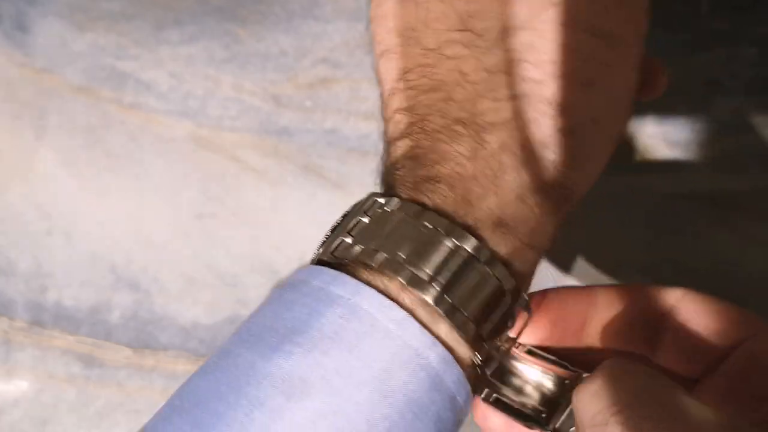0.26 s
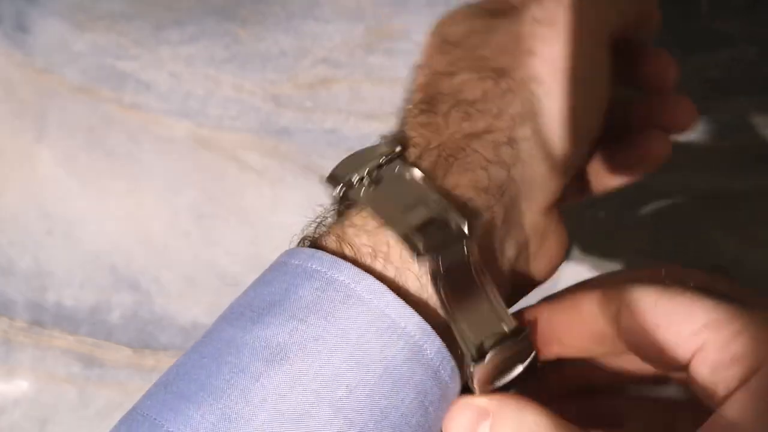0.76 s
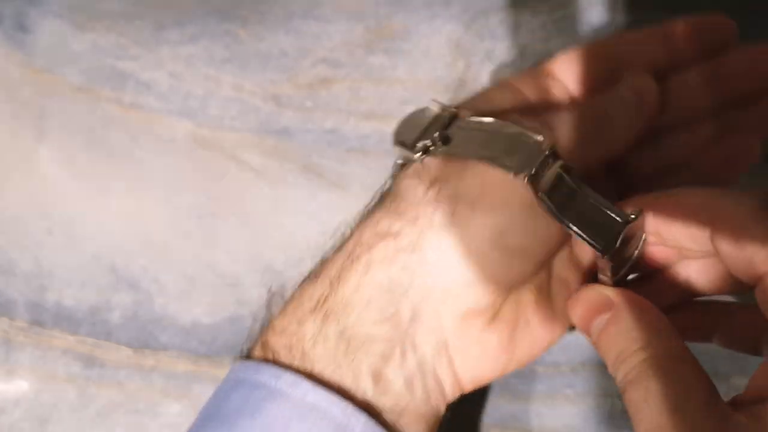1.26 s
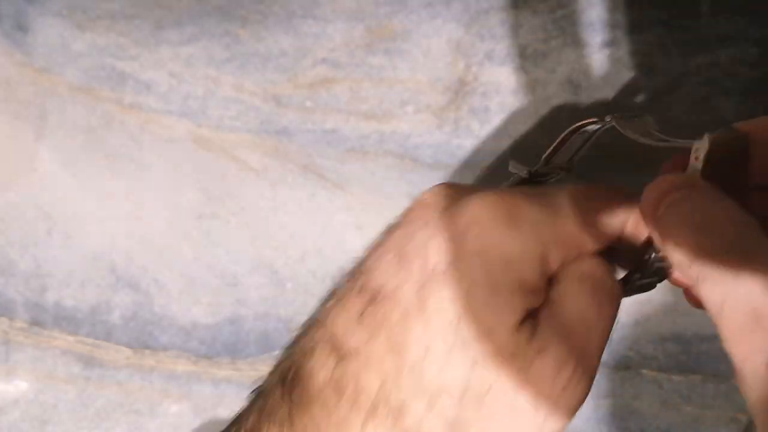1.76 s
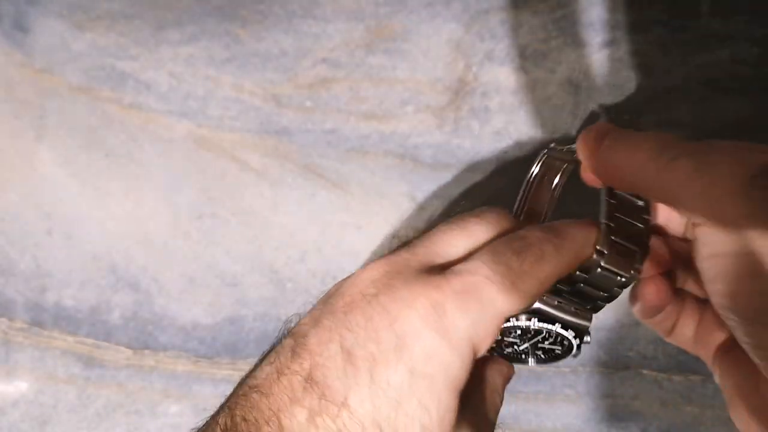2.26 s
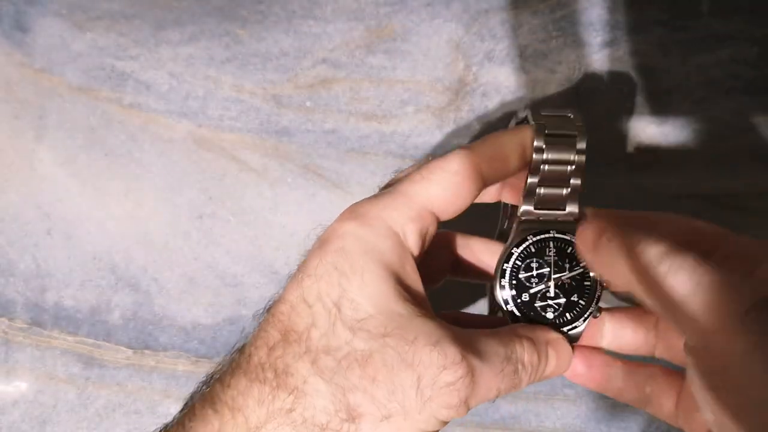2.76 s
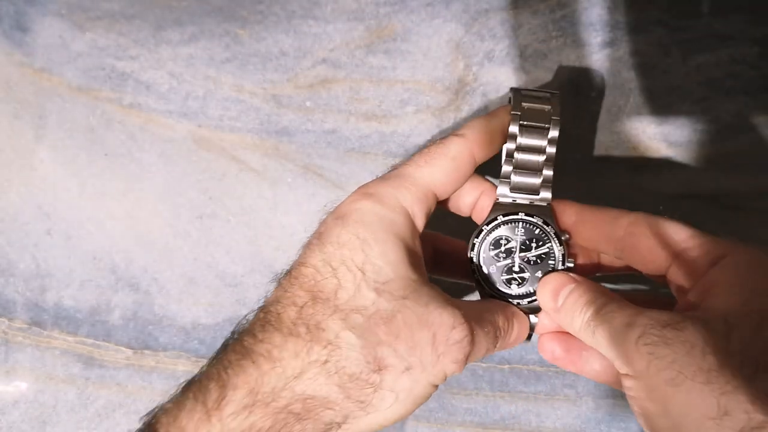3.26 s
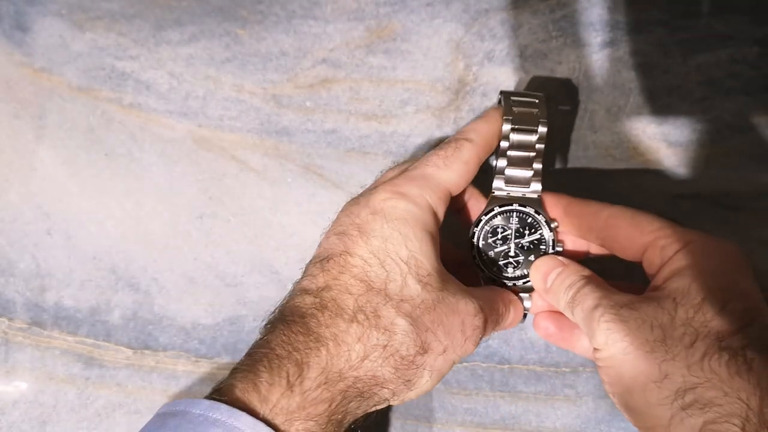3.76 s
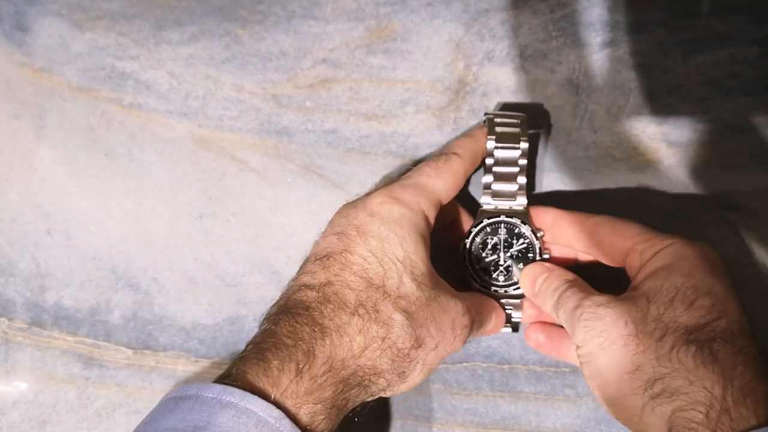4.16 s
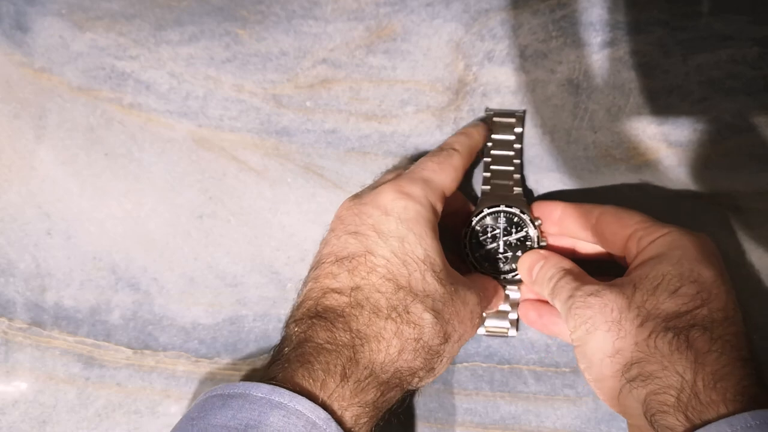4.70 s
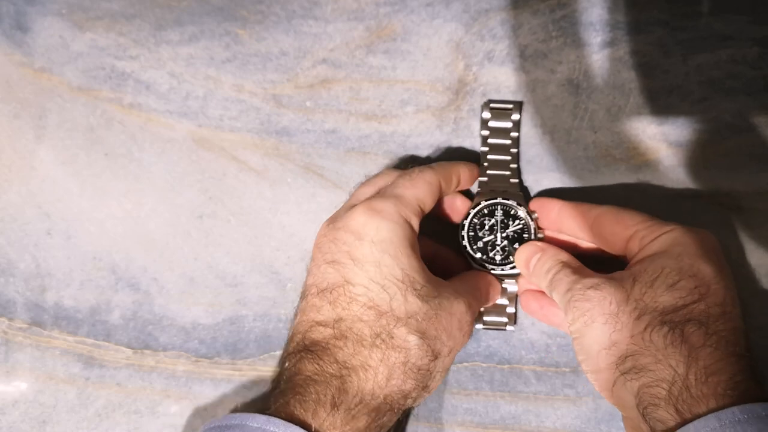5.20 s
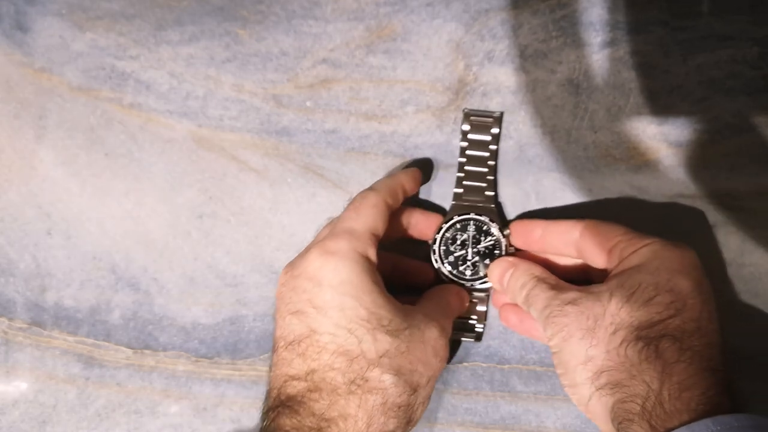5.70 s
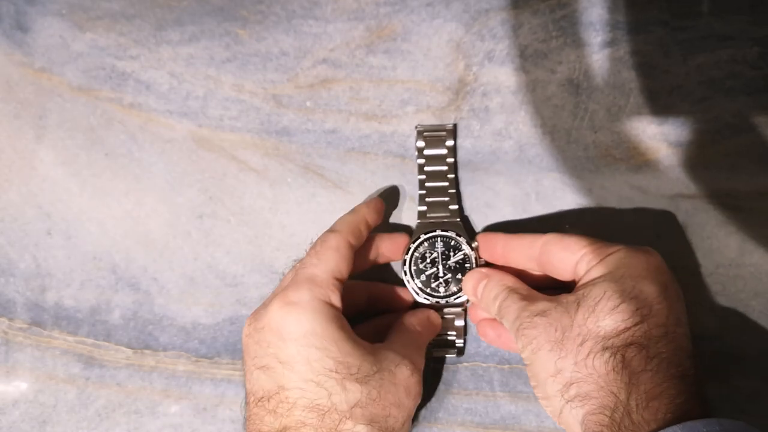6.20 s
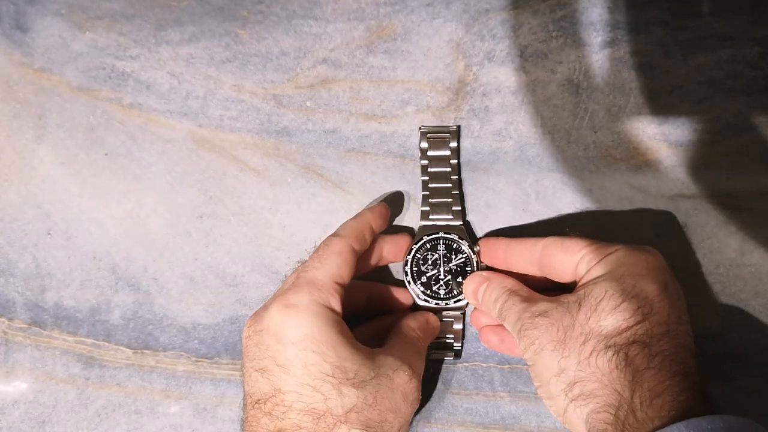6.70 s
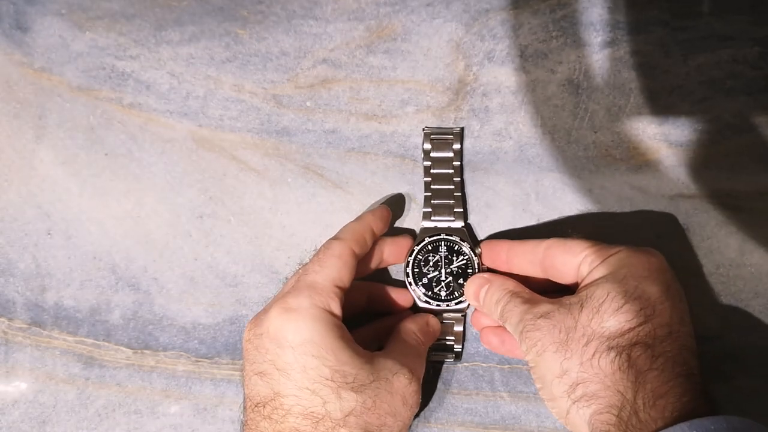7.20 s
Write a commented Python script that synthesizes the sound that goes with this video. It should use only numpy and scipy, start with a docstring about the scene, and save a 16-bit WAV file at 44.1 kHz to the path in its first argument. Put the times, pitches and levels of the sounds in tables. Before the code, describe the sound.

Small bright metallic clicks from a watch clasp and bracelet come first, one snap standing out, with a brief flurry of clinks and dry rustling. Handling fades to faint ticks. Then case and links land on a cushioned tabletop in two main clacks with dull thumps, followed by soft sliding and minor adjustments. Close stereo microphones, action nearer the right, quiet indoor rumble beneath.

```python
"""Steel watch bracelet laid on a padded table

A small room with a quiet rumble and two spaced microphones, the right one close to the action.
In the hand, clasp and links click and rustle: short noisy contacts and drags ring the modes of the steel.
Then case and links knock and scrape on the table, harder knocks sounding brighter. The table top thumps
from its own low modes, and the room answers with a tail of decaying noise."""
import sys
import numpy as np
from scipy import signal
from scipy.fft import rfft, irfft
from scipy.io import wavfile
from scipy.ndimage import uniform_filter1d

SR = 44100
rng = np.random.default_rng(int(sys.argv[2]) if len(sys.argv) > 2 else 0)


def file_out(sig):
    """Save sig as 16-bit WAV at sys.argv[1]."""
    # one column per channel
    cols = np.atleast_2d(sig).T
    # limit, then scale
    lim = np.clip(cols, -1, 1)
    pcm = np.round(lim * 32767).astype(np.int16)
    wavfile.write(sys.argv[1], SR, pcm)


N = 328545
T = np.arange(N) / SR
HIT_T = T[:SR // 4]


def undb(db):
    """Decibels to gain."""
    return 10 ** (np.asarray(db) / 20)


def unit(x):
    """Scale to rms 1."""
    return x / np.sqrt(np.mean(x ** 2))


def band(x, lo, hi, order=3):
    """Causal band-pass between two frequencies in Hz."""
    return signal.sosfilt(signal.butter(order, [lo, hi], "band", fs=SR, output="sos"), x)


def at_level(x, db, size=256):
    """Scale a hit so that its loudest few milliseconds reach db."""
    return x * undb(db) / np.sqrt(uniform_filter1d(x ** 2, size).max())


def add(track, s, x):
    """Mix x into the track at time s."""
    i = int(s * SR)
    track[i:i + len(x)] += x[:N - i]


def coloured(points):
    """Noise of rms 1 whose spectrum follows the given points of frequency and level."""
    hz, db = np.transpose(points)
    bin_hz = np.arange(N // 2 + 1) * SR / N
    gain = undb(np.interp(np.log(bin_hz + 1), np.log(hz), db))
    return unit(irfft(rfft(rng.standard_normal(N)) * gain, N))


# spectrum of the quiet room, relative: freq_hz [Hz], density_db [dB per Hz]
ROOM = [(12, -46.5), (20, -12), (40, 0), (60, 4), (79, -11.5), (100, -5), (127, -14), (163, -14),
        (513, -29.5), (574, -30), (1480, -25), (3250, -30.5), (7310, -40), (10500, -41.5), (16000, -63)]
ROOM_DB = -66.5


def room_noise():
    """Rumble shared by both microphones and a faint hiss, opposite in sign at the two."""
    mid, side = coloured(ROOM), coloured(ROOM)
    side = signal.sosfilt(signal.butter(1, 450, "high", fs=SR, output="sos"), side)
    return undb(ROOM_DB) * np.array([mid + side, mid - side])


# level of the room tail against the direct sound, before the shade on the left: freq_hz [Hz], level_db [dB]
WALLS = [(150, -7.5), (600, 0), (2000, -6.5), (5000, -8.5), (9600, -14.5), (15000, -14.5)]
# how long the room rings: freq_hz [Hz], t60_s [s]
WALLS_T60 = [(150, .3), (600, .24), (2000, .37), (5000, .31), (10000, .31), (15000, .23)]


def reverb(x, left_db, shade_hz):
    """Diffuse tail: each third of an octave stores energy and lets it go as noise, different at each microphone."""
    hz, db = np.transpose(WALLS)
    t60_hz, t60_s = np.transpose(WALLS_T60)
    air, tail = rng.standard_normal((2, N)), np.zeros((2, N))
    for lo in 110 * 2 ** (np.arange(22) / 3):
        hi = lo * 2 ** (1 / 3)
        centre = np.sqrt(lo * hi)
        decay_s = np.interp(np.log(centre), np.log(t60_hz), t60_s)
        keep = np.exp(-2 * np.log(1000) / (SR * decay_s))
        # a trace of noise keeps the stored energy above zero
        power = band(x + 1e-12 * air[0], lo, hi) ** 2
        energy = signal.lfilter([1 - keep], [1, -keep], power)
        # the hands shade the left side, more towards the treble
        shade_db = np.array([[left_db], [0]]) * centre / (centre + shade_hz)
        gain = undb(np.interp(np.log(centre), np.log(hz), db) + shade_db)
        tail += gain * np.sqrt(energy) * unit(band(air, lo, hi))
    return tail


def microphones(x, left_db, scatter_db, lag_count=26):
    """The hands shade the left microphone: later (lag in samples), weaker, partly by nearby reflections."""
    t = HIT_T[:SR // 50]
    nearby = rng.standard_normal(len(t)) * np.exp(-t / 0.0049)
    scattered = signal.fftconvolve(x, nearby / np.linalg.norm(nearby))[:N]
    left = np.pad(x, (lag_count, 0))[:N] * undb(left_db) + scattered * undb(scatter_db)
    return np.array([left, x])


# ranges of the steel sound, from hollow body through clack and ring to sizzle: low_hz [Hz], high_hz [Hz]
BANDS_HZ = [(330, 850), (1050, 2800), (2800, 5500), (5500, 11000), (11000, 17000)]


def tilt(brightness_db, pivot_hz):
    """A sharper contact lifts ranges above the pivot and lowers those below; the hollow body follows the clack."""
    octave = np.log2(BANDS_HZ).mean(1)
    return brightness_db * (np.maximum(octave, octave[1]) - np.log2(pivot_hz))


def ring(modes, scatter_db, detune):
    """Response of the steel to one tap: decaying modes, weighted and tuned a little differently at each call."""
    hz, width, db = np.transpose(modes)[:, :, None]
    strength, pitch, side = rng.standard_normal((3, len(hz), 1))
    t = HIT_T[:SR // 12]
    # a wide mode dies faster, so it starts stronger to reach the same spectral peak
    gain = width * undb(db + scatter_db * strength) * np.sign(side)
    decay = np.exp(-np.pi * width * t)
    tone = np.sin(2 * np.pi * hz * (1 + detune * pitch) * t)
    y = (gain * decay * tone).sum(0)
    return y / np.linalg.norm(y)


def grains(count, spread_db):
    """A dense run of tiny contacts of uneven strength."""
    strength_db = spread_db * np.minimum(rng.exponential(size=count), 5)
    return unit(rng.standard_normal(count) * undb(strength_db))


def contact(modes, levels_db, chatter, tap_db, crack_db, detune):
    """One tap and the chatter of loose links after it ring the steel; each range gets its own level."""
    push = grains(len(HIT_T), 4.3) * np.exp(-HIT_T / max(chatter, .0005))
    push[0] += undb(tap_db)
    ringing = signal.fftconvolve(push, ring(modes, 2, detune))[:len(push)]
    steel = ringing + undb(crack_db) * push
    return sum(at_level(band(steel, *edges, order=5), db) for edges, db in zip(BANDS_HZ, levels_db))


def rubbing(modes, spread_db, crack_db):
    """Steel dragging over skin or table: fine uneven slips excite its modes."""
    knots = T[::300]
    unevenness_db = 4.4 * np.interp(T, knots, rng.standard_normal(len(knots)))
    slips = grains(N, spread_db) * undb(unevenness_db)
    ringing = signal.fftconvolve(slips, ring(modes, 0.69, 0))[:N]
    return unit(ringing + undb(crack_db) * band(slips, 1400, 11000, order=2))


def stroke(start, length, attack, drift_db, release):
    """Envelope of one movement: it sets in, drifts in level (dB per s) while it lasts and dies away."""
    age = np.maximum(T - start, 0)
    onset = np.minimum(age / attack, 1)
    drift = undb(drift_db * np.minimum(age, length))
    return onset * drift * np.exp(-np.maximum(age - length, 0) / release)


# resonances of the whole watch, also used by landing: pitch_hz [Hz], width_hz [Hz], level_db [dB]
WATCH = [(1069, 36, 2), (1296, 67, -5), (1586, 25, 4), (1915, 180, 5.5), (2054, 75, 3.5), (2534, 90, 4.5),
         (2769, 110, 1.5), (3253, 57, -3), (4400, 910, -23.5), (5790, 280, -4), (6460, 100, -19),
         (7240, 150, -0.5), (7570, 340, -8.5), (9330, 78, -1.5), (9550, 140, -4.5), (10370, 360, -8.5),
         (10710, 390, -6.5), (14000, 270, -16), (14600, 300, -26)]
# hands nudging the watch over the table: start_s [s], length_s [s], scrape_db [dB], rumble_db [dB]
NUDGES = [(4.9, 0.18, -75.5, -64.5), (5.066, 0.4, -63, -62.5), (5.815, 0.26, -73, -76),
          (6.132, 0.1, -68, -69.5), (6.328, .23, -67.5, -77), (6.782, 0.58, -85.5, -70.5)]
NUDGE_ATTACK_S, NUDGE_DRIFT_DB_PER_S, NUDGE_RELEASE_S = 0.041, 0.5, .07


def nudging():
    """The watch scrapes along, dulled by the padding, and the hands set the table rumbling softly."""
    strokes = np.array([stroke(s, length, NUDGE_ATTACK_S, NUDGE_DRIFT_DB_PER_S, NUDGE_RELEASE_S)
                        for s, length, *_ in NUDGES])
    _, _, scrape_db, rumble_db = np.transpose(NUDGES)
    scrape = unit(band(rubbing(WATCH, spread_db=0.0, crack_db=-1), 970, 7000, order=1))
    rumble = unit(band(rng.standard_normal(N), 135, 220, order=2))
    return scrape * (undb(scrape_db) @ strokes), rumble * (undb(rumble_db) @ strokes)


# resonances of clasp and links, also used by rustle: pitch_hz [Hz], width_hz [Hz], level_db [dB]
CLASP = [(2044, 610, -14), (2688, 230, -9), (3765, 150, -7.5), (4590, 210, -6.5), (5780, 870, -9),
         (6790, 200, -7), (7410, 630, -1.5), (7500, 700, -11), (9220, 190, -0.5), (9710, 300, 2),
         (10510, 120, -7), (12330, 400, -8.5), (13400, 400, -9)]
# what all clicks share, one value for each range of BANDS_HZ: level_db [dB]
CLICK_COLOUR = [-37.5, -16.5, -8.5, -0.5, -9]


def click(chatter, db, brightness_db):
    """One small steel contact of clasp or link, tilted in colour by its sharpness."""
    levels_db = db + np.array(CLICK_COLOUR) + tilt(brightness_db, pivot_hz=7800)
    return contact(CLASP, levels_db, chatter, tap_db=11.5, crack_db=-1.5, detune=0.02)


# moves of the hand dragging links over each other and the skin: start_s [s], length_s [s], level_db [dB]
MOVES = [(1.068, 0.28, -65), (1.461, 0.29, -71.5), (1.929, 0.42, -70.5), (2.373, 0.26, -76.5),
         (2.79, .04, -68), (3.224, 0.088, -72.5)]
MOVE_ATTACK_S, MOVE_DRIFT_DB_PER_S, MOVE_RELEASE_S = 0.023, -7.5, 0.045
# loose links tick at random: average rate, level above the rustle, random spread, chatter time
TICKS_PER_S, TICK_DB, TICK_SPREAD_DB, TICK_CHATTER_S = 25, 3, -2, 0.0014


def rustle():
    """Each move of the hand drags the bracelet along and may shake a few faint ticks out of it."""
    effort = sum(undb(db) * stroke(s, length, MOVE_ATTACK_S, MOVE_DRIFT_DB_PER_S, MOVE_RELEASE_S)
                 for s, length, db in MOVES)
    out = effort * rubbing(CLASP, spread_db=-0.5, crack_db=8.5)
    for s, length, db in MOVES:
        gaps = rng.uniform(size=12) * 2 / TICKS_PER_S
        strengths = rng.standard_normal(size=12)
        tick = click(TICK_CHATTER_S, db + TICK_DB, brightness_db=6.0)
        for delay, strength in zip(np.cumsum(gaps), strengths):
            if delay < length:
                add(out, s + delay, tick * undb(TICK_SPREAD_DB * strength))
    return out


# clasp and links clicking in the hand, level before colour:
# start_s [s], chatter_s [s], level_db [dB], brightness_db [dB per octave]
CLICKS = [(0.159, 0.0022, -50.5, 13), (0.215, 0.0013, -63.5, 5), (0.256, 0.0033, -63, -1),
          (0.275, 0.0038, -60.5, -3), (0.484, 0.0017, -63, 0), (0.495, 0.0031, -44.5, 1),
          (0.609, 0.0025, -19, 3.5), (0.893, 0.0068, -41, 4.5), (0.954, 0.0025, -51.5, 5),
          (1.1267, 0.0025, -41.5, 17), (1.16, 0.027, -48.5, -3.5), (1.187, 0.0068, -37.5, -3),
          (1.216, .012, -55.5, -8.5), (1.2317, 0.0037, -29, 10.5), (1.336, 0.0039, -64, -10),
          (1.355, 0.01, -65.5, -10.5), (1.46, 0.0035, -56.5, 0.5), (1.486, 0.01, -56.5, 1),
          (1.99, .009, -57.5, 5), (2.018, 0.01, -54, 0), (2.118, 0.0056, -41, 3.5), (2.224, 0.023, -52, 0),
          (2.266, 0.014, -68, -4), (2.282, 0.006, -55, -6), (2.293, 0.0093, -57.5, -4.5),
          (2.429, 0.0038, -61, 17), (3.041, .0014, -59, -2), (3.251, 0.005, -60.5, -3.5),
          (3.279, .004, -60.5, 1), (3.729, 0.0047, -58, -2), (3.922, .0018, -54, 6), (4.08, 0.0023, -53, 7)]


def bracelet():
    """The clasp snaps open and links click as the watch comes off: each contact rings the small steel parts."""
    out = np.zeros(N)
    for s, chatter, db, brightness_db in CLICKS:
        add(out, s, click(chatter, db, brightness_db))
    return out


# resonances of the padded table top: pitch_hz [Hz], width_hz [Hz], level_db [dB]
TABLE = [(63, 10, -6.5), (104.2, 10, -8.5), (130, 13, -10.5), (163.4, 8.9, 7), (224, 26, 3),
         (295.3, 30, -3)]


def table_ring(scatter_db, detune):
    """The table top after one soft blow, different at each spot: the padding lets it swell before it dies away."""
    hz, width, db = np.transpose(TABLE)[:, :, None]
    strength, pitch = rng.standard_normal((2, len(hz), 1))
    decay = np.exp(-np.pi * width * HIT_T)
    tone = np.sin(2 * np.pi * hz * (1 + detune * pitch) * HIT_T)
    modes = undb(db + scatter_db * strength) * decay * tone
    return modes.sum(0) * (1 - np.exp(-HIT_T / 0.0034))


# watch and links landing on the table, steel level before colour:
# start_s [s], chatter_s [s], level_db [dB], brightness_db [dB per octave], thump_db [dB]
KNOCKS = [(4.396, 0.0083, -46.5, 1.5, -68.5), (4.402, 0.00097, -42, 0.5, -54),
          (4.651, 0.0074, -27.5, 3, -34.5), (4.667, 0.012, -37, 5, -60), (4.69, .03, -48.5, 1, -45),
          (4.737, 0.0063, -46.5, 2, -55.5), (4.879, 0.0058, -55, -4.5, -50.5),
          (4.897, 0.0045, -46.5, -3.5, -51), (5.038, .011, -54, -3, -53), (5.049, 0.0055, -51.5, 2, -73),
          (5.138, .021, -49, 2, -51.5), (5.167, 0.044, -41, 0.5, -40), (5.179, 0.0057, -20, 1.5, -29),
          (5.198, .004, -25, 3.5, -53), (5.221, .007, -34.5, 1.5, -40), (5.24, 0.027, -42.5, 3, -44),
          (5.398, .005, -59, 6.5, -68.5), (5.411, 0.0063, -53.5, 2, -59), (6.089, 0.021, -47.5, 5, -42.5),
          (6.111, 0.016, -48, 2, -49), (6.154, 0.007, -60.5, -2.5, -50.5), (6.792, .013, -70.5, -0.5, -68),
          (7.212, 0.0034, -75.5, -2.5, -67)]
# colour of a knock in each range of BANDS_HZ:
# level_db at a medium knock [dB], hardening [dB gained for each dB that the knock is harder]
KNOCK_COLOUR = [(-15, -0.14), (4.5, -0.1858), (-1, -0.1651), (0, 0.1), (-14, 0.22)]
MEDIUM_KNOCK_DB = -40
THUMP_DETUNE = .012  # share by which the pitch of the table varies from spot to spot


def landing():
    """Case and links meet the table: steel rings above, brighter when hit harder; the table top thumps below."""
    steel, thumps = np.zeros(N), np.zeros(N)
    colour_db, hardening = np.transpose(KNOCK_COLOUR)
    for s, chatter, db, brightness_db, thump_db in KNOCKS:
        hardness_db = hardening * (db - MEDIUM_KNOCK_DB)
        levels_db = db + colour_db + hardness_db + tilt(brightness_db, pivot_hz=3900)
        add(steel, s, contact(WATCH, levels_db, chatter, tap_db=16, crack_db=-3.5, detune=0.007))
        add(thumps, s, at_level(table_ring(scatter_db=2, detune=THUMP_DETUNE), thump_db))
    return steel, thumps


def scene():
    """Steel, table and room together at the two microphones."""
    steel, thumps = landing()
    scrape, rumble = nudging()
    in_hand = bracelet() + rustle()
    on_table = steel + scrape
    direct = microphones(in_hand, left_db=-17, scatter_db=-11.5)
    direct = direct + microphones(on_table, left_db=-16, scatter_db=-12)
    room = reverb(in_hand + on_table + undb(-3.5) * thumps, left_db=-10.0, shade_hz=400)
    # the broad table top is as near to one microphone as to the other
    return direct + thumps + rumble + room + room_noise()


TOP_HZ = 15700


def record(dry):
    """The recorder cuts the top with a steep low-pass."""
    return signal.sosfilt(signal.ellip(8, .2, 70, TOP_HZ, fs=SR, output="sos"), dry)


dry = scene()
out = record(dry)
file_out(out)
```